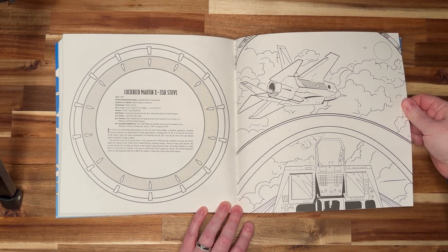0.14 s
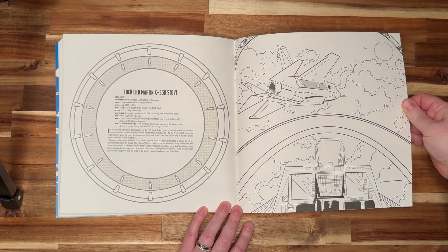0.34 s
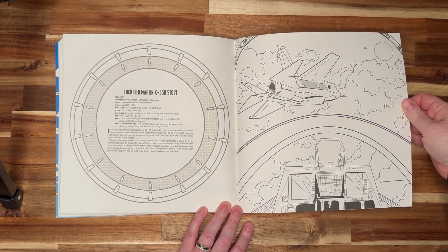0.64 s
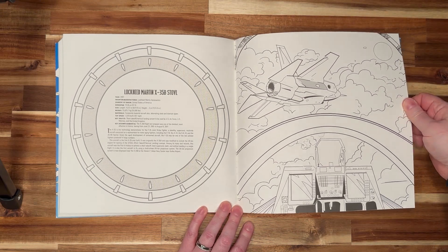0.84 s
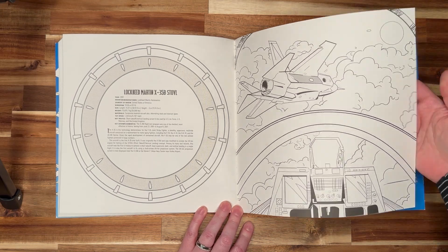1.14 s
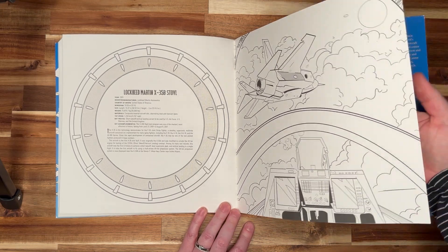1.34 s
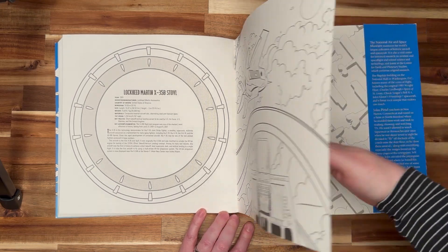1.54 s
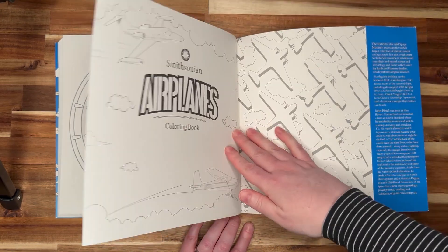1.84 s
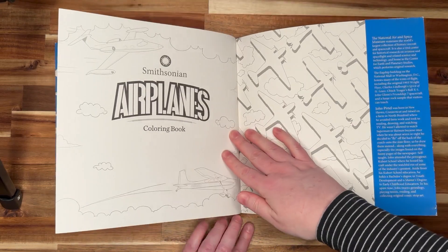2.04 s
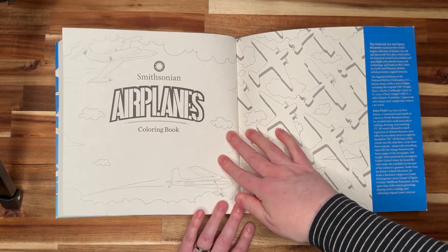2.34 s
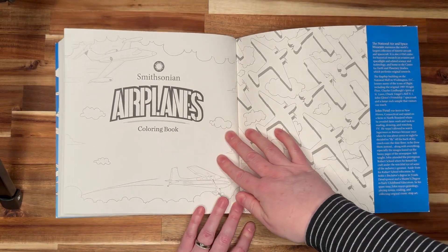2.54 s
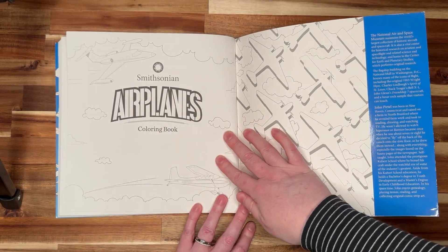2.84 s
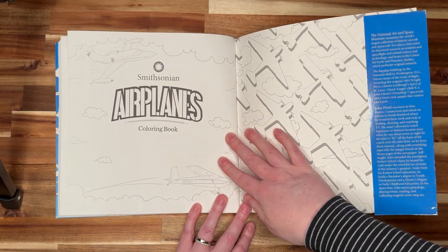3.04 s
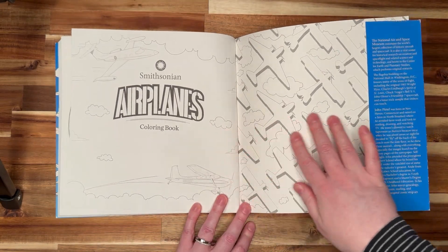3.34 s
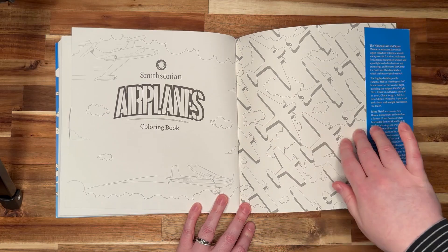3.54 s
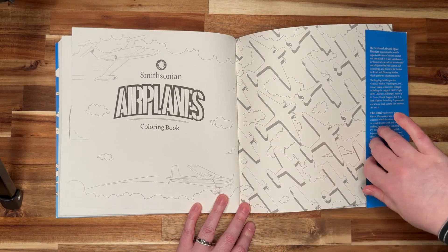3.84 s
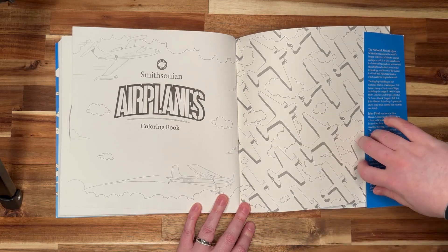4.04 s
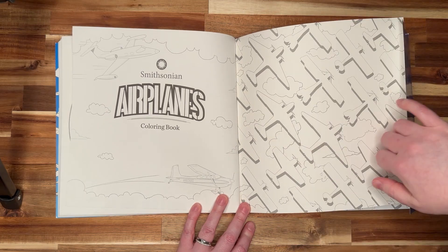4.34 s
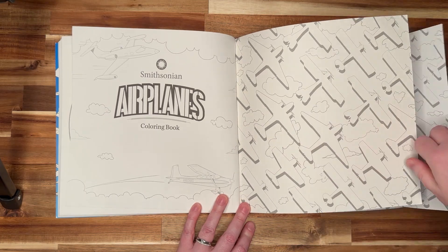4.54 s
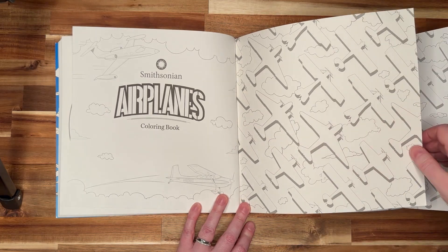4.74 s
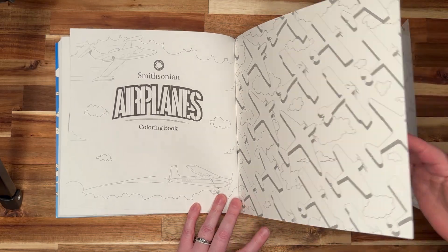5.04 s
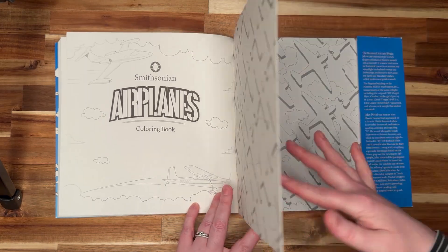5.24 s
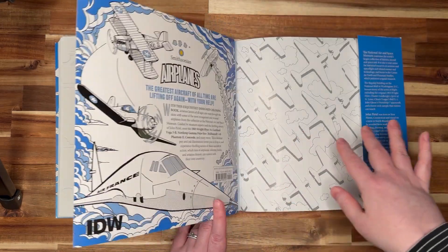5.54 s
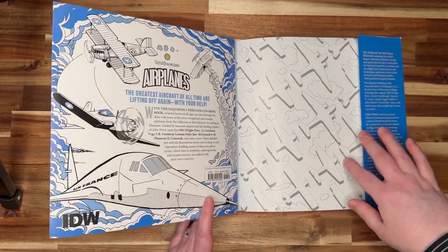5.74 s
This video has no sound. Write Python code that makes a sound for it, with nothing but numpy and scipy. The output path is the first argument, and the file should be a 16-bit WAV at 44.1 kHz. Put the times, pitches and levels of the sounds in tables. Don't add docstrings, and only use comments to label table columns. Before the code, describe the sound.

A quiet small room with a steady low ventilation rumble and faint hiss, the book very close to a phone microphone in stereo. Two tiny nail ticks sound just after 0 s, and two faint paper snaps around 0.75 s. From 0.85 s fingers hiss and scuff, and a stiff page buckles and flops in a cluster at 1.2 to 1.5 s. Softer swishes and light flops follow to about 2.2 s, then near quiet. At 3.0 s the spine gives a loud, bright, sharp crack with a short fizzing tear of glue, then fine hissy rubbing. From 3.7 s rustling and scuffing thicken, crowded by 4.0 to 4.5 s. At 4.53 s the jacket flap slips off with the loudest, hard, mid-pitched click, followed by papery knocks until 4.8 s. Breathy page-edge drags run to 5.6 s, with small soft snaps and settling near 5.7 to 5.9 s.

```python
import sys
import numpy as np
from scipy import signal
from scipy.fft import rfft, irfft
from scipy.io import wavfile
from scipy.ndimage import uniform_filter1d

SR = 44100
rng = np.random.default_rng(int(sys.argv[2]) if len(sys.argv) > 2 else 0)


def dump(signal):
    limited = np.clip(np.atleast_2d(signal).T, -1, 1)
    pcm = np.round(limited * 32767).astype(np.int16)
    wavfile.write(sys.argv[1], SR, pcm)


def volts_from_db(level):
    exponent = np.asarray(level, float) / 20
    return 10 ** exponent


N = 260190

# f/Hz, level per Hz/dB
AIR_COLOUR = [(25, -36.5), (35, -19.5), (50, -5.5), (77, 0.5), (100, -14.5), (150, -12.5), (220, -24),
              (320, -23), (450, -40), (1100, -51), (2200, -46), (3800, -38.5), (4900, -49), (7300, -37),
              (10000, -51.5), (15000, -42)]
# start t/s, firmest t/s, end t/s, level/dB, brightness/(dB per octave)
STROKES = [(-.05, 0.053, .15, -65, -1), (0.828, .92, 1.16, -59, -3), (1.087, 1.3, 1.5, -60, -11),
           (1.237, 1.28, 1.32, -58, -2.5), (1.41, 1.48, 1.63, -63, -8), (1.205, 1.633, 2.05, -61, 2.5),
           (1.974, 2.29, 2.52, -66.5, -0.5), (2.41, 2.46, 2.52, -70, 4), (2.53, 2.605, 2.724, -69, 4.5),
           (2.718, 2.754, 2.9, -66.5, 2.5), (3.0, 3.03, 3.44, -61, 4.5), (3.029, 3.08, 3.2, -60, -5),
           (3.106, 3.28, 3.52, -58, 4), (3.38, 3.66, 3.83, -57, 0), (3.77, 3.98, 4.06, -63, -6.5),
           (4, 4.13, 4.32, -56, -4), (4.18, 4.4, 4.7, -55, -0.5), (4.397, 4.5, 4.66, -48, -6),
           (4.531, 4.55, 4.62, -58.5, -7.5), (4.628, 4.74, 4.93, -67, 4), (4.791, 4.954, 5.44, -61, -1),
           (5.05, 5.3, 5.5, -69.5, 4), (5.45, 5.6, 5.75, -73, 2), (5.693, 5.88, 6.25, -63, 0)]
# f/Hz, width/Hz
SLIDE_BANDS = [
    (750, 576),
    (1750, 1520),
    (3500, 2530),
    (7400, 7520),
]
# start t/s, firmest t/s, end t/s, level/dB
DRAGS = [
    (1.62, 1.75, 1.94, -68),
    (1.6, 1.9, 2.08, -70.5),
    (4.84, 4.94, 5.23, -62),
    (5.13, 5.16, 5.547, -61.5),
    (5.43, 5.586, 5.66, -66),
    (4.8, 5.21, 5.52, -61.5),
    (0.826, 0.95, 1.08, -61),
    (4.2, 4.36, 4.52, -55.5),
]
# f/Hz, width/Hz, level/dB
DRAG_WHISTLES = [
    [(4200, 740, 8)],
    [(4440, 380, 7.5)],
    [(1050, 410, 8.5), (2500, 1300, -15)],
    [(4300, 620, 2), (1345, 310, 7.5), (2130, 600, 5), (6600, 950, -6.5)],
    [(1700, 1060, 0)],
    [(1317, 850, -3), (2030, 1540, 0.3)],
    [(2100, 480, -0.5), (3950, 1200, 1.5)],
    [(3300, 2200, 0.3), (6000, 1200, -1.5)],
]
# t/s, peak level/dB, brightness/dB, fall time/s
SCUFFS = [(.858, -55, -1, 0.033), (.976, -44, 0.5, 0.023), (1.077, -41, -6.5, 0.023),
          (1.103, -50, -1.5, 0.039), (1.167, -42, -1.5, 0.021), (1.184, -35, -24, 0.026),
          (1.194, -26.5, -8.5, 0.011), (2.15, -40.5, -1, 0.024), (2.314, -55.5, 1, 0.017),
          (2.45, -63, -6, 0.036), (2.554, -68, 4, 0.16), (2.744, -66, 4, 0.035),
          (3.696, -36.5, -4.5, 0.036), (3.734, -44.5, -22, 0.035), (3.908, -41, -7, 0.022),
          (3.936, -37, -8, 0.036), (4.043, -29, -6, 0.02), (4.074, -42, -13, 0.057),
          (4.122, -35, -8.5, 0.021), (4.234, -40, -3.5, 0.042), (4.289, -47, 3.5, 0.1),
          (4.349, -34, -8, 0.022), (4.384, -34.5, -2.5, 0.028), (4.464, -38.5, -19, 0.04),
          (4.645, -42, -7.5, 0.023), (4.661, -30.5, -6.5, 0.012), (4.678, -26, -7.5, 0.017),
          (4.907, -37, -30, 0.011), (4.998, -41, -4, 0.05), (5.089, -49.5, -23, 0.042)]
# t/s, peak level/dB, f/Hz, length/s
SHIVERS = [(.036, -43, 710, 0.02), (.076, -50, 720, 0.023), (1.156, -41, 500, .008),
           (1.254, -26.5, 1000, .016), (1.256, -34, 2000, .012), (1.275, -25.5, 950, .016),
           (1.349, -35.5, 950, .022), (1.348, -57, 1700, .025), (1.41, -39, 510, .01),
           (1.459, -30.5, 800, .015), (1.454, -51, 1900, .017), (1.478, -30.5, 850, .014),
           (1.495, -43, 800, .025), (1.493, -60, 1950, .04), (3.021, -36.5, 2500, .016),
           (3.048, -31, 550, .016), (3.067, -42, 550, .018), (3.126, -41, 500, .03), (3.631, -45, 870, .01),
           (3.699, -41.5, 3500, .03), (3.694, -48, 6000, .018), (3.728, -39, 900, .022),
           (3.862, -55, 1500, .01), (3.905, -48, 2600, .012), (3.944, -48, 4200, .035),
           (3.97, -36, 900, .008), (4.048, -34, 900, .014), (4.05, -41, 4200, .015),
           (4.115, -46, 4300, .03), (4.13, -33, 850, .011), (4.243, -42, 900, .012),
           (4.299, -45.5, 3000, .012), (4.33, -27, 880, .012), (4.332, -42.5, 3000, .02),
           (4.381, -38, 2200, .022), (4.411, -42, 3300, .012), (4.444, -30.5, 900, .014),
           (4.445, -37.5, 1900, .008), (4.461, -40, 1700, .012), (4.552, -18.5, 1430, .018),
           (4.573, -31, 1650, .013), (4.596, -33, 700, .016), (4.661, -26.5, 1100, .012),
           (4.664, -33.5, 3300, .011), (4.679, -22.5, 1050, .009), (4.684, -22.5, 710, .011),
           (4.678, -32, 3000, .016), (4.693, -25.5, 750, .013), (4.741, -24, 1010, 0.016),
           (4.76, -34.5, 1200, .014)]
# t/s, peak level/dB, f/Hz
THUMPS = [(1.169, -36, 333), (1.254, -45.5, 220), (1.358, -43, 216), (1.464, -37.5, 199), (3.001, -40, 398),
          (3.127, -40, 372), (4.326, -43.5, 214), (4.463, -38.5, 310), (4.531, -27.5, 374),
          (4.678, -47, 368), (5.005, -39.5, 321), (5.029, -41.5, 340), (5.799, -46, 320)]
# multiple of its pitch, level/dB
SHEET_MODES = [(.6, -11.5), (.8, -13), (1, 5.5), (1.3, -2), (1.65, -6), (2.1, -0.5), (2.6, -6)]
# t/s, peak level/dB, f/Hz, ring time/s
FLOPS = [(1.261, -23, 548, 0.014), (1.271, -25.5, 455, .02), (1.28, -28.5, 800, 0.053),
         (1.317, -35.5, 575, 0.032), (1.353, -35, 600, 0.035), (1.361, -30.5, 484, 0.025),
         (1.463, -27.5, 463, 0.01), (1.464, -30.5, 772, 0.05), (1.481, -48, 827, 0.035),
         (1.49, -36, 795, .049), (1.853, -34.5, 610, 0.0079), (1.869, -41, 633, 0.019),
         (1.931, -36.5, 616, 0.011), (1.971, -35.5, 820, 0.03), (2.158, -31.5, 738, 0.13),
         (2.432, -50, 540, .027), (3.013, -20.5, 705, 0.023), (3.802, -37, 850, 0.013),
         (4.131, -29, 705, 0.03), (4.546, -23.5, 632, 0.028), (4.552, -15, 658, .022),
         (4.561, -15, 650, 0.038), (4.577, -26.5, 684, 0.044), (4.594, -37, 617, 0.035),
         (4.714, -33, 573, .013), (4.745, -29.5, 800, 0.037), (4.749, -21.5, 650, 0.018),
         (5.691, -44, 1530, 0.011), (5.801, -38.5, 880, .01)]
# t/s, peak level/dB, f/Hz, crack minus ring level/dB, sizzle minus ring level/dB
SNAPS = [(0.022, -48, 690, -3, -16), (.733, -45.5, 665, -2.5, -7), (.78, -41.5, 660, -11, -30),
         (1.201, -28.5, 650, -9, -7.5), (1.254, -25, 614, -18, -23), (1.655, -37.5, 620, -25, -12),
         (1.994, -50.5, 920, 3, 3.5), (2.156, -36.5, 710, -2, 2), (2.175, -37, 695, -15, -12),
         (2.94, -49, 473, -18, -20), (2.967, -46.5, 510, -14, -30), (3.004, -19.5, 558.7, 1.5, 5.5),
         (3.047, -33, 504, -8, -10), (3.118, -38.5, 690, -7, -34), (4.329, -22.5, 702, -12, -16),
         (4.445, -26.5, 890, -8, -10.5), (4.535, -14, 1034, -20, -33), (5.689, -41, 498, -15.5, -7),
         (5.784, -46, 1430, -6.5, -10.5), (5.833, -50.5, 436, 2, 13), (5.87, -55, 1450, 5, 6)]
# f/Hz, level/dB
TEAR_COLOUR = [(1000, -21), (2500, -15), (5000, 2.5), (8000, 1), (10500, 5), (12500, -8.5), (14500, 0),
               (16800, 8.5)]
# (f/Hz, level/dB, time to fall 60 dB/s)
BLOWS = [
    (0.0296, -20, [(707, -4, 0.02), (1510, -7, .005), (2380, -5, .004), (4400, -3.5, 0.0042), (6000, -7, 0.0033), (9500, -17, 0.0047)]),
    (0.0691, -23.5, [(730, -4.5, 0.018), (1500, -5, .005), (2420, -3.5, 0.0041), (4400, -0.5, 0.0038), (6000, -4.5, .003), (9200, -9, 0.0042)]),
    (2.9947, -28, [(560, -0.5, 0.023), (2500, 0, 0.014), (3700, -3, 0.0083), (4950, 5, .01), (7500, -10, 0.012)]),
    (3.0041, -6, [(553, 7, 0.021), (1460, -29, 0.0091), (2510, -0.5, 0.024), (3900, 8.5, 0.008), (5540, 2, 0.0032), (6440, 8, 0.0084), (7710, 1, 0.015), (9450, -8, 0.011), (11200, 3, .006), (13700, 5.5, 0.0075), (15480, 1, .006)]),
    (4.5295, 0, [(324, -20, 0.018), (680, 6.5, 0.0093), (1027, -6, 0.015), (1436, -2, 0.017), (1792, -7, 0.025), (2375, -5.5, 0.0083), (3300, -22, 0.017), (4300, -30, 0.013), (6260, -31.5, 0.017), (7500, -30.5, 0.0091)]),
]
# delay t/s, level/dB
ECHOES = [
    (.0022, -21),
    (.008, -19.5),
    (.024, -19.5),
    (0.034, -23.5),
    (0.047, -17.5),
]
# f/Hz, level/dB
DIFFUSE_SHARE = [(60, -42.5), (150, -15), (280, -10.5), (500, -1.5), (1200, -5), (2000, -14.5),
                 (3000, -3.5), (3800, -15.5), (4800, 4.5), (6000, -16), (9000, -30), (16000, -19)]
# f/Hz, level/dB
BALANCE = [(60, 0.3), (250, 0.5), (600, 2), (1200, -1), (2000, -2), (4500, 4), (5500, 0)]
# f/Hz, phase/rad
PORT_LEAD = [(4500, 0), (5200, -.8), (6000, 0), (8000, 1.1), (10000, 2), (12600, np.pi), (15000, 4.15),
             (16000, 4.5)]
# f/Hz, level/dB
MIC_COLOUR = [(1000, -2.5), (4450, -2.5), (4900, -5), (5400, 2), (8500, 2), (11000, -13), (14500, -17.5),
              (15800, -5)]
# f/Hz, level/dB
TREBLE_CUT = [(15850, 0), (16000, -26), (17000, -34), (17150, -70)]


def shape(x, points):
    hz, db = np.transpose(points)
    f = np.maximum(np.fft.rfftfreq(x.shape[-1], 1 / SR), 1)
    gain = volts_from_db(np.interp(np.log(f), np.log(hz), db))
    return irfft(rfft(x) * gain, x.shape[-1])


def band(x, hz, width_hz):
    edges = [max(hz - width_hz / 2, 30), min(hz + width_hz / 2, .45 * SR)]
    y = signal.sosfilt(signal.butter(2, edges, "bandpass", fs=SR, output="sos"), x)
    return y / np.sqrt(np.mean(y ** 2))


def walk(rate):
    hold = int(SR / rate)
    steps = np.repeat(rng.standard_normal(N // hold + 1), hold)
    smooth = uniform_filter1d(uniform_filter1d(steps, hold), hold)
    return 1.7 * smooth[:N]


def add(out, s, x):
    i = int(s * SR)
    out[i:i + len(x)] += x[:N - i]


def fibres(size, scatter_db):
    extra = np.minimum(rng.exponential(size=size), 4)
    return rng.standard_normal(size) * volts_from_db(scatter_db * extra)


def stroke(start, firmest, end):
    press = np.interp(np.arange(N) / SR, [start, firmest, end], [0, 1, 0])
    return np.sin(np.pi / 2 * press) ** 1.26


def table_bounce(x, share=0.41):
    return x + share * np.roll(x, rng.integers(15, 70))


def ringing(t, hz, db, t60, rise):
    start = rng.choice([-1, 1], len(hz)) * volts_from_db(db)
    decay = volts_from_db(-60 * t / np.maximum(t60, .003)[:, None])
    modes = np.sin(2 * np.pi * hz[:, None] * t) * decay
    x = start @ modes * (1 - np.exp(-(t / rise) ** 2))
    return x / abs(x).max()


def air():
    x = shape(rng.standard_normal(N), AIR_COLOUR) * volts_from_db(0.22 * walk(8.8))
    return x * volts_from_db(-51.5) / np.sqrt(np.mean(x ** 2))


def room(x):
    t60_s, level_db = 0.17, -10.5
    t = np.arange(int(.5 * SR)) / SR
    tail = shape(rng.standard_normal(len(t)), [(200, 6.0), (1000, -0.5), (4000, -4.5), (12000, -4)])
    tail *= volts_from_db(-60 * t / t60_s) * (1 - np.exp(-t / 0.0013))
    tail *= volts_from_db(level_db) / np.sqrt(np.sum(tail ** 2))
    return signal.fftconvolve(x, tail)[:N]


def slide():
    octaves = np.log2(np.array(SLIDE_BANDS)[:, :1] / 1750)
    power = 0
    for *times, db, tilt in STROKES:
        power = power + (volts_from_db(db + tilt * octaves) * stroke(*times)) ** 2
    levels = np.sqrt(power)
    coarse, fine = fibres(N, 2.75), fibres(N, 2.1)
    flutter = .8 * walk(25)
    band_ticks, trims_db = (coarse, coarse + fine, fine, fine), (.1, -.1, -3, .1)
    out = np.zeros(N)
    for level, trim_db, ticks, (hz, width) in zip(levels, trims_db, band_ticks, SLIDE_BANDS):
        out += level * volts_from_db(trim_db + 0.67 * walk(14)) * band(ticks, hz, width)
    out += volts_from_db(3.0) * levels[-1] * band(fine, 11730, 6200)
    return volts_from_db(flutter) * out


def drag():
    out = np.zeros(N)
    for (*times, level_db), whistles in zip(DRAGS, DRAG_WHISTLES):
        ticks = fibres(N, 1.3) * volts_from_db(walk(38.95))
        breath = sum(volts_from_db(db) * band(ticks, hz, width) for hz, width, db in whistles)
        out += volts_from_db(level_db) * stroke(*times) * breath
    return out


def scuffs():
    out, t = np.zeros(N), np.arange(9000) / SR
    for s, db, mid_db, fall in SCUFFS:
        rise = .005 + .2 * abs(fall)
        fall = max(fall, .003)
        top_db = -1 + 1.45 * mid_db
        easing = np.exp(-(np.maximum(t - rise, 0) / fall) ** 3.2)
        swell = np.where(t < rise, np.sin(np.pi / 2 * t / rise) ** 2, easing)
        ticks = table_bounce(fibres(len(t), 1.4), 0.62)
        colour = band(ticks, 966, 1020)
        colour += volts_from_db(mid_db) * band(ticks, 2090, 2000)
        colour += volts_from_db(top_db) * band(ticks, 12100, 9300)
        add(out, s - .3 * rise, volts_from_db(db - 7) * swell * colour)
    return out


def shivers():
    out, t = np.zeros(N), np.arange(3000) / SR
    for s, db, hz, length in SHIVERS:
        part = t / max(length, .003)
        swell = np.minimum(part / .25, 1) * np.exp(-(part / 0.81) ** 3)
        x = swell * band(fibres(2 * len(t), 1.5), hz, 0.32 * hz)[len(t):]
        add(out, s, volts_from_db(db - 6.5) * x * np.sqrt(np.sum(swell ** 2) / np.sum(x ** 2)))
    return out


def thumps():
    out, t = np.zeros(N), np.arange(6000) / SR
    for s, db, hz in THUMPS:
        pitches = hz * np.array([.82, 1, 1.25])
        thump = ringing(t, pitches, np.array([-5, 0, -3]), np.full(3, .09), 0.0044)
        add(out, s, volts_from_db(db) * thump)
    return out


def buckles():
    out, t = np.zeros(N), np.arange(6000) / SR
    ratio, mode_db = np.transpose(SHEET_MODES)
    snap_ring_s, flop_crack_db = 0.028, -31.5
    events = [(*row, snap_ring_s) for row in SNAPS]
    events += [(*row, flop_crack_db, flop_crack_db, ring) for *row, ring in FLOPS]
    for s, db, hz, mid_db, top_db, ring in events:
        ring = max(ring, .004)
        chance = rng.standard_normal((len(SHEET_MODES), 2))
        pitches = hz * ratio * (1 + 0.025 * chance[:, 0])
        levels = mode_db + 0.32 * mid_db * np.log2(np.maximum(ratio, 1)) + 1.18 * chance[:, 1]
        modes = ringing(t, pitches, levels, ring / np.sqrt(ratio), 0.00064)
        crack = np.exp(-t / (0.097 * ring)) + 0.23 * np.exp(-t / (.5 * ring))
        crack *= 1 - np.exp(-t / 0.00014)
        ticks = table_bounce(fibres(len(t), 2.4))
        treble = volts_from_db(mid_db) * band(ticks, 3260, 5400) + volts_from_db(top_db) * band(ticks, 11000, 4900)
        add(out, s - .0002, volts_from_db(db) * (modes + 1.064 * crack * treble))
    return out


def tear():
    out, t = np.zeros(N), np.arange(8000) / SR
    x = shape(fibres(len(t), 1.4), TEAR_COLOUR)
    x = x / x.std()
    flash, tail = np.exp(-t / 0.0017), np.exp(-t / 0.027)
    top = volts_from_db(8.5) * band(x, 14400, 5600) * flash ** 1.3
    burst = x * (flash + 0.37 * tail) + top
    add(out, 3.003, volts_from_db(-12.5) * burst * (1 - np.exp(-t / 0.00023)))
    return out


def blows():
    out, t = np.zeros(N), np.arange(6000) / SR
    for s, db, modes in BLOWS:
        add(out, s - .0008, volts_from_db(db) * ringing(t, *np.transpose(modes), 0.00058))
    return out


def scene():
    sheets = scuffs() + shivers() + thumps() + buckles() + tear() + blows()
    echoes = sum(volts_from_db(db) * np.roll(sheets, int(s * SR)) for s, db in ECHOES)
    paper = sheets + volts_from_db(-13) * echoes + slide() + drag()
    shared = paper + room(sheets) + air()
    walls = shape(volts_from_db(6) * room(paper), [(150, -13.5), (400, -16), (900, 0)])
    diffuse = shape(walls + volts_from_db(3.0) * air(), DIFFUSE_SHARE)
    lean = np.array(BALANCE) * [1, .5]
    left = shape(shared, lean) + diffuse
    right = shape(shared, lean * [1, -1]) - diffuse
    return np.array([left, right])


def top_cut(x):
    return signal.sosfilt(signal.butter(12, 17130, fs=SR, output="sos"), x)


def record(dry):
    hz, lead = np.transpose(PORT_LEAD)
    turn = np.exp(.5j * np.interp(np.fft.rfftfreq(N, 1 / SR), hz, lead))
    coloured = shape(shape(dry, MIC_COLOUR), TREBLE_CUT)
    ports = irfft(rfft(coloured) * np.array([1 / turn, turn]), N)
    return top_cut(ports)


dry = scene()
out = record(dry)
dump(out)
```